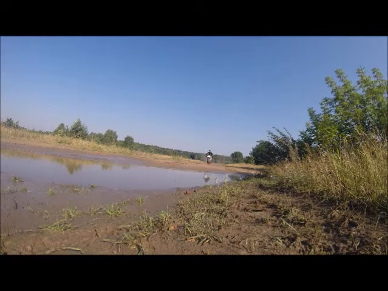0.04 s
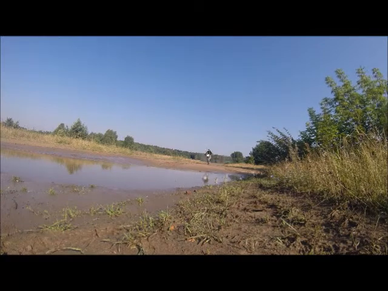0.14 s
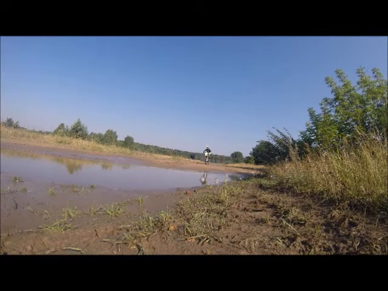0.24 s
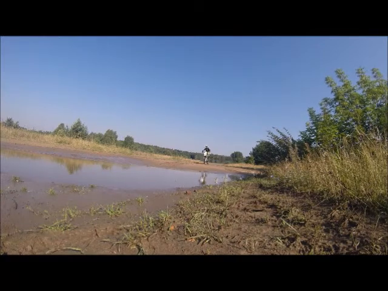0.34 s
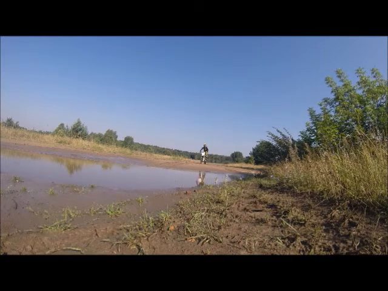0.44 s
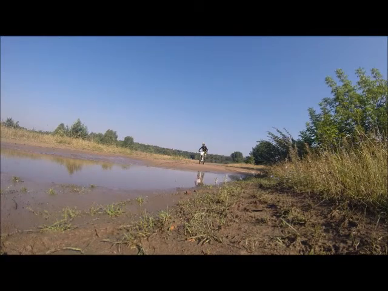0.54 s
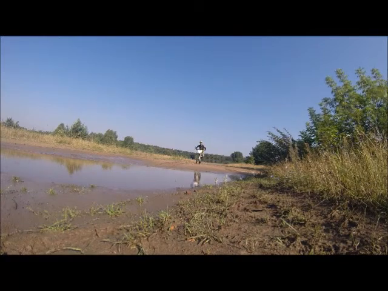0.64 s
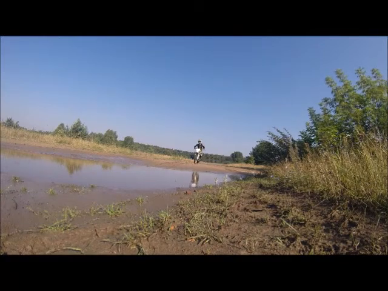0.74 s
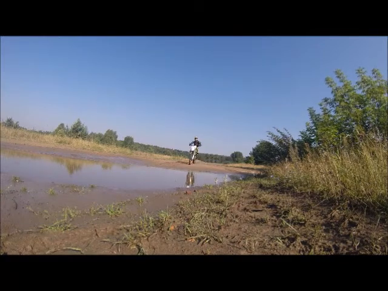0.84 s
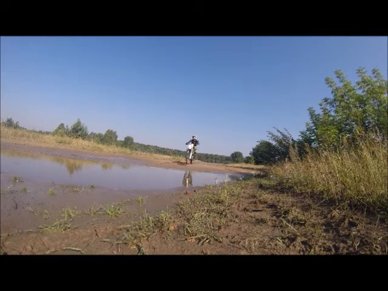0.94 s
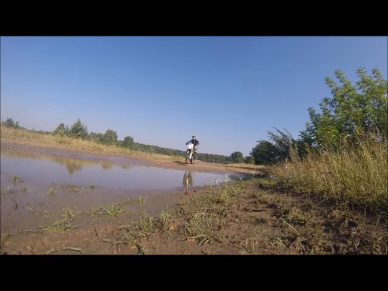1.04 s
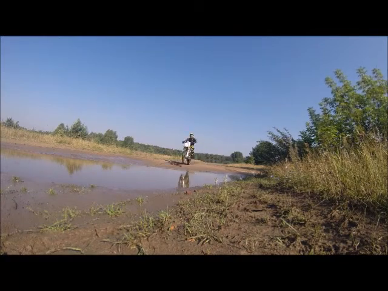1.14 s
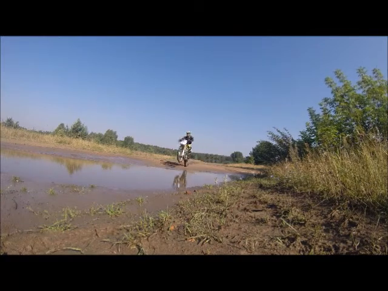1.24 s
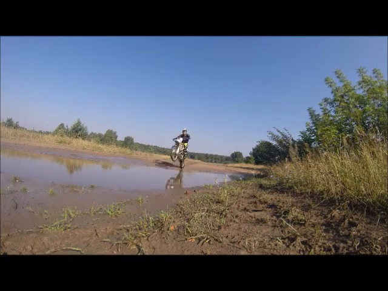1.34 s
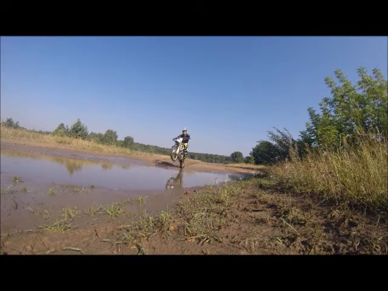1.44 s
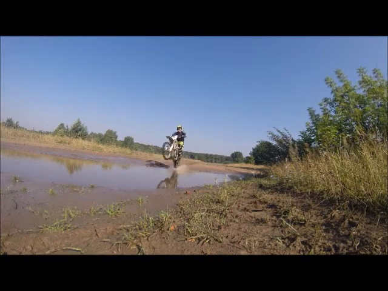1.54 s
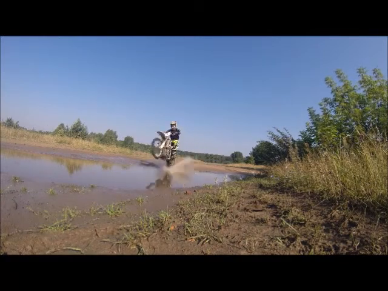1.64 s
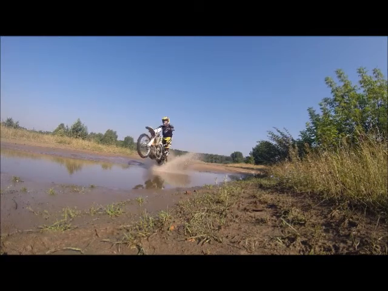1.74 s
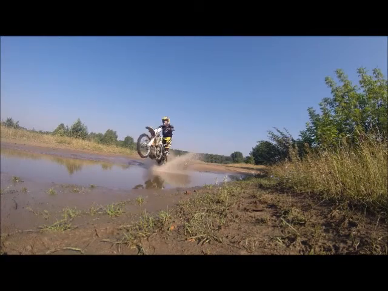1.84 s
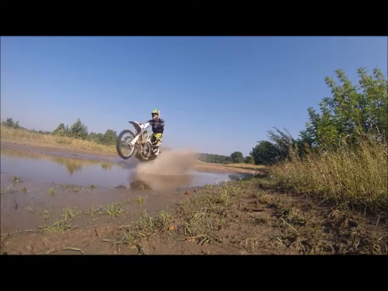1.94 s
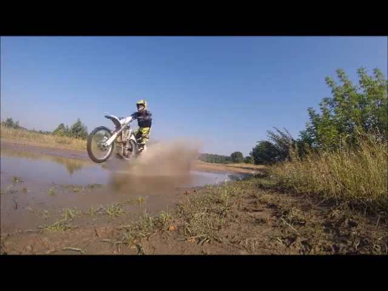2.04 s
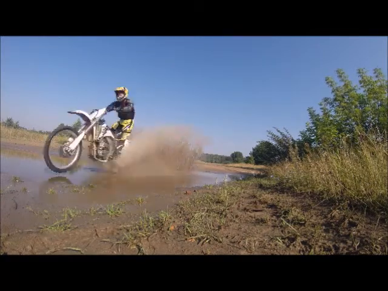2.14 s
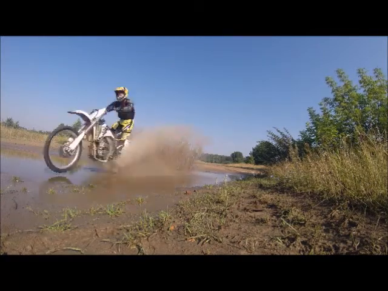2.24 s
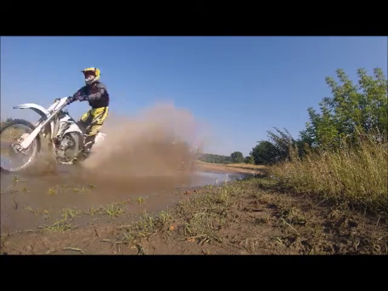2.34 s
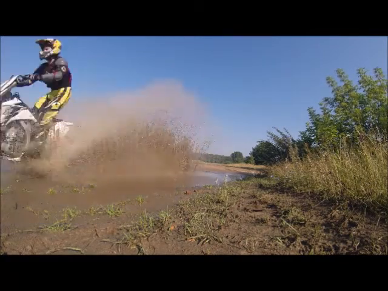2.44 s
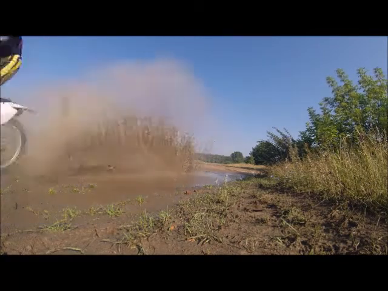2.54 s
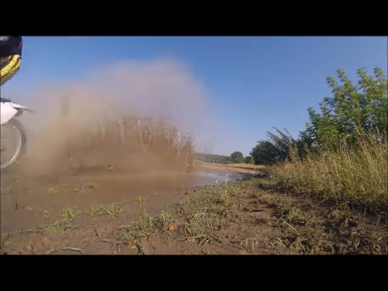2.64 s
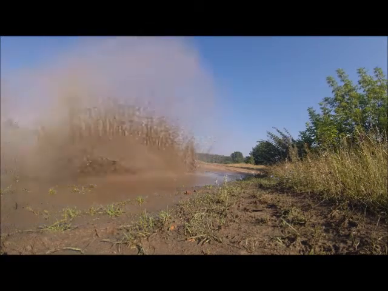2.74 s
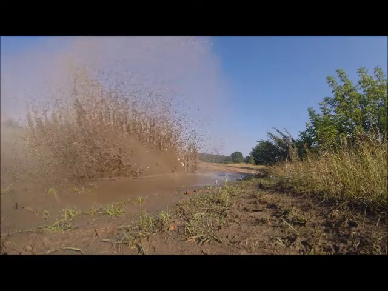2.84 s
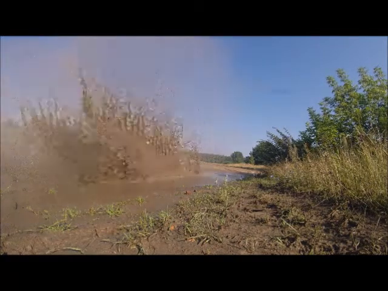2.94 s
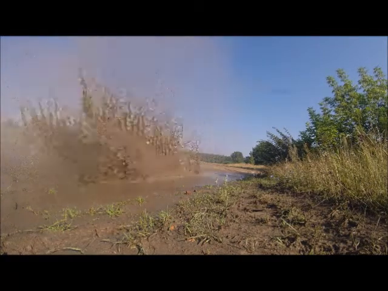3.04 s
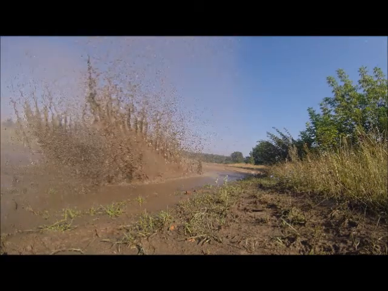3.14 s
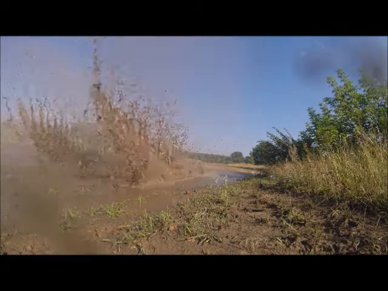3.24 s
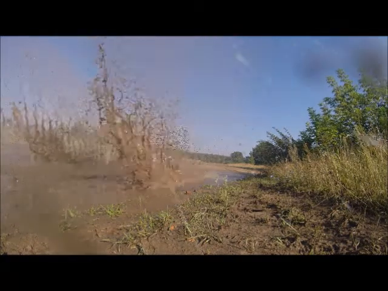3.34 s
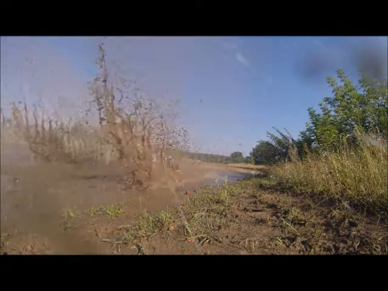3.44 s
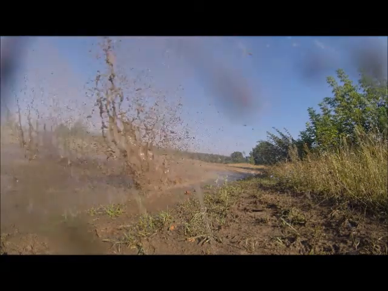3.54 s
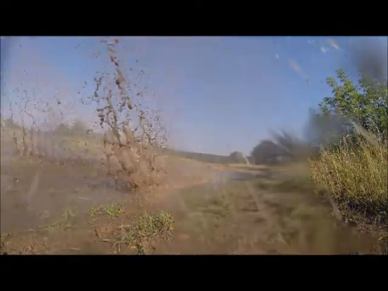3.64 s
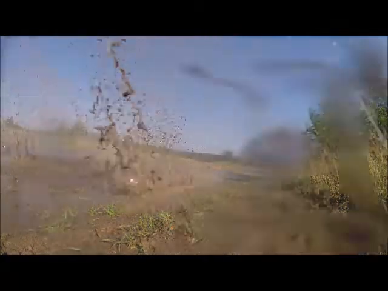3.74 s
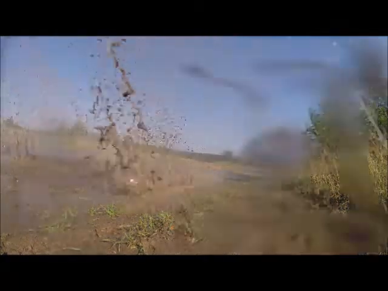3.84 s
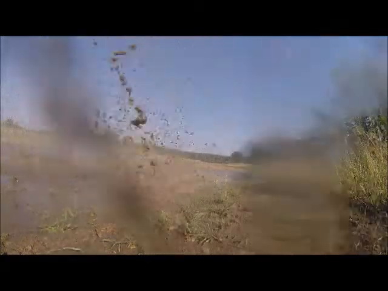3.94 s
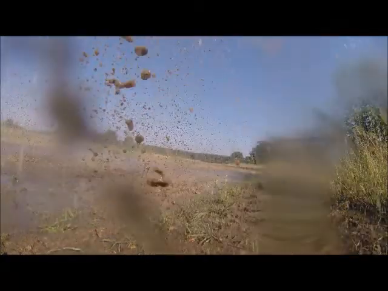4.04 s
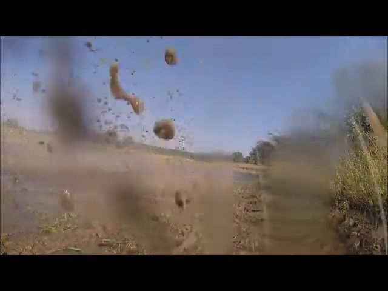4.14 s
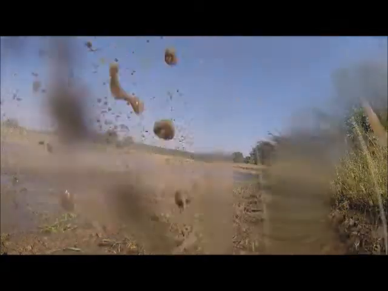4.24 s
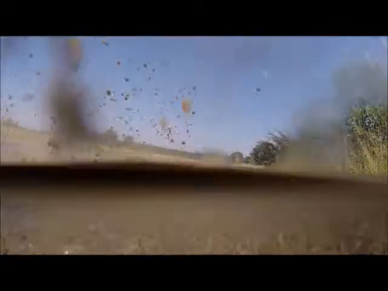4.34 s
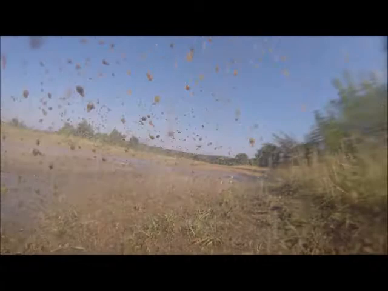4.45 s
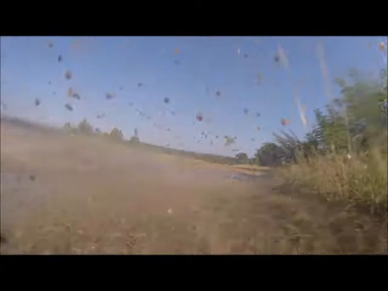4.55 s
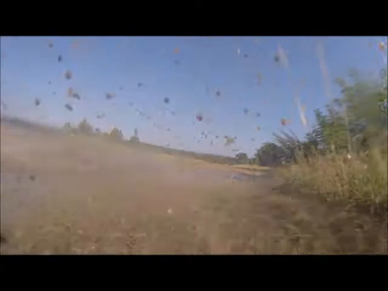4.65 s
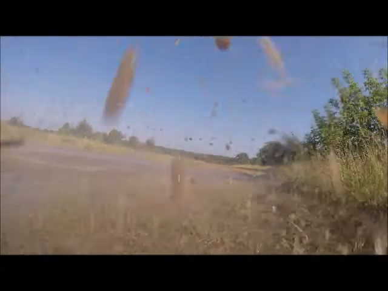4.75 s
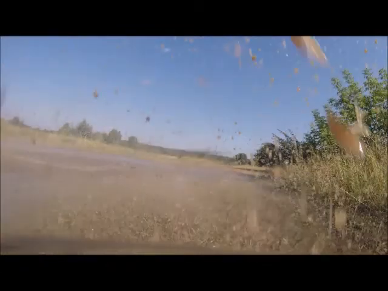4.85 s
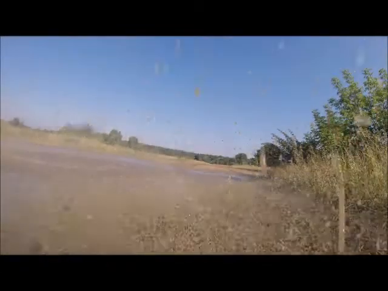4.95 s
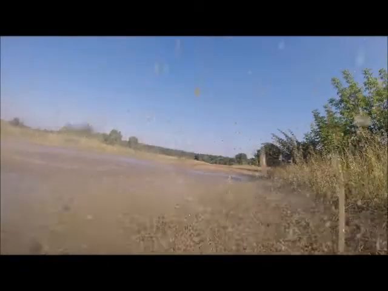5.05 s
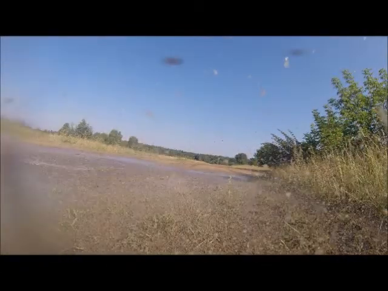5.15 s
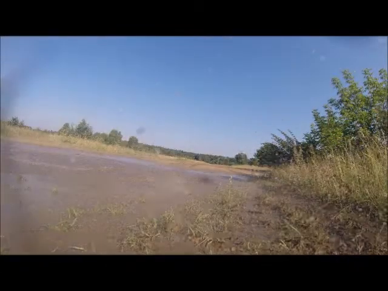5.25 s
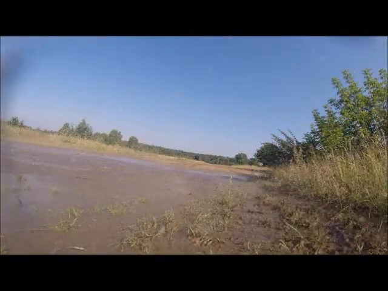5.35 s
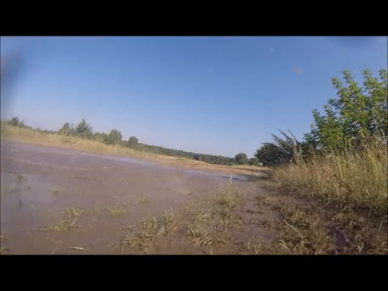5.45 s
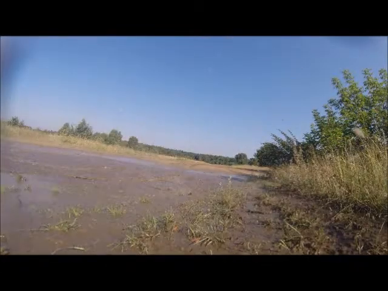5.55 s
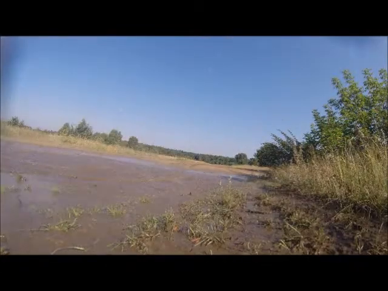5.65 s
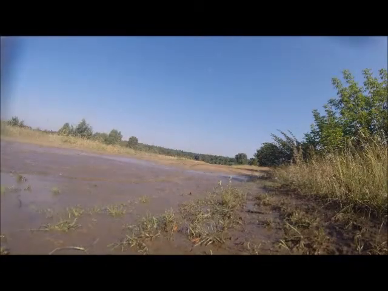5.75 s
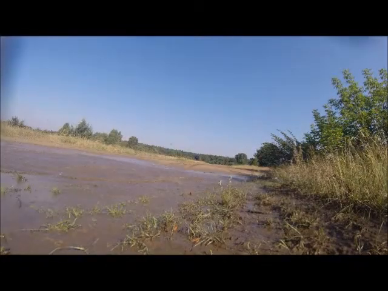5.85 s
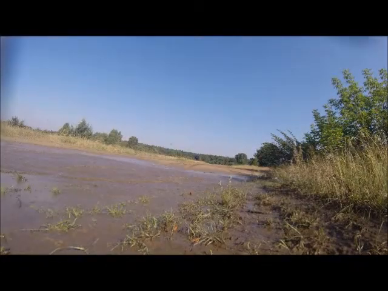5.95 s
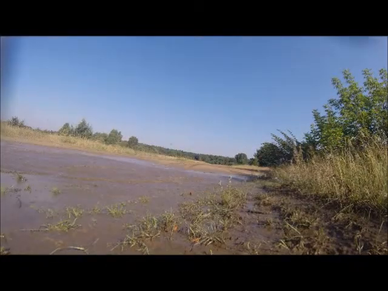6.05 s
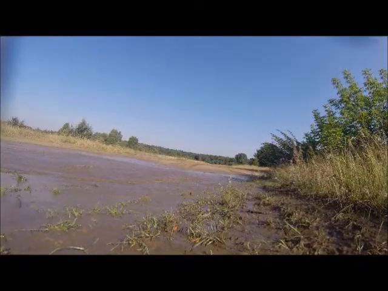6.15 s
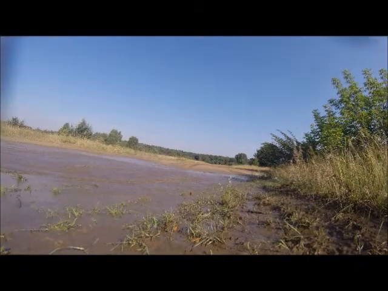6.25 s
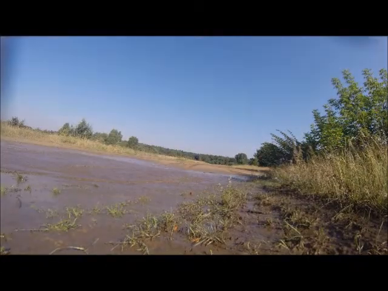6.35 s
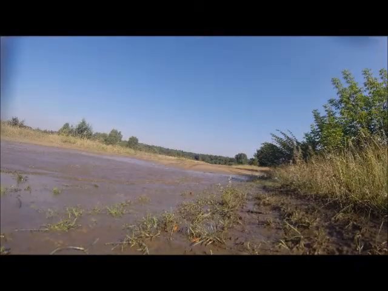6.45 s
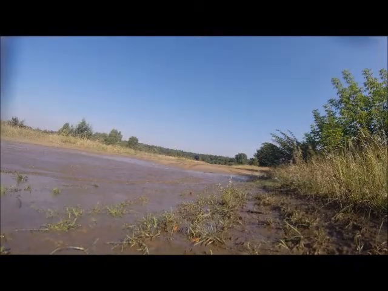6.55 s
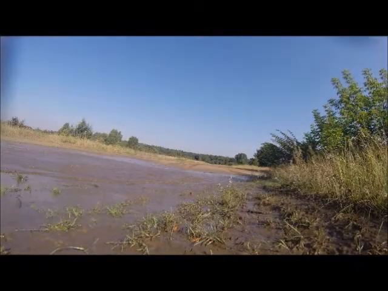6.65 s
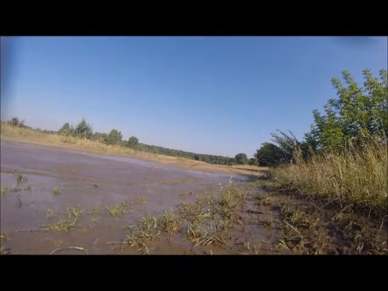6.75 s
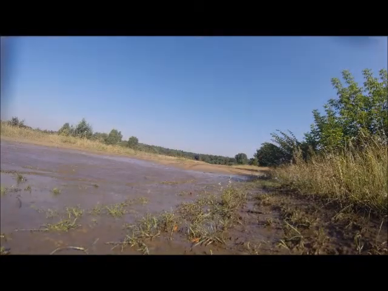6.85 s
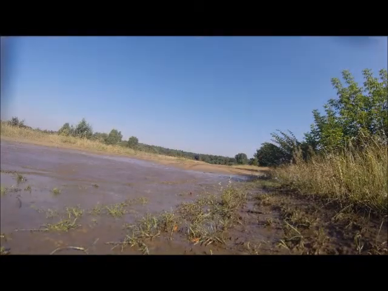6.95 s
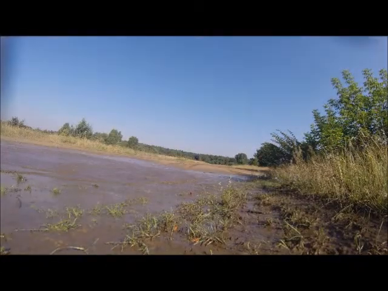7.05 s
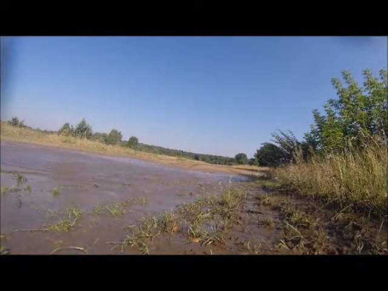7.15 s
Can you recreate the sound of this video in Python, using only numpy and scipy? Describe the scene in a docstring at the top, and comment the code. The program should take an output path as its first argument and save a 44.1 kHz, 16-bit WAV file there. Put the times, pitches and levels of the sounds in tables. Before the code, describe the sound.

Single-cylinder motocross engine nears, cuts out briefly, returns deeper and duller, ploughs through water and fades; hollow mud splats pelt the microphone, then faint wind.

```python
"""A single-cylinder dirt bike nears across a wet field; after a short silent gap it sounds deeper and duller.
The bike ploughs through a puddle past a microphone in a small plastic housing, and thrown mud rains on it.
Then the level drops to light wind, a few last drips, low moans and dull thuds.
Firing pulses excite filters for boom and bark, shaped noise makes roar, wind and hiss,
and struck resonators make the housing ring."""
import sys
import numpy as np
from scipy import signal
from scipy.fft import irfft
from scipy.io import wavfile
from scipy.ndimage import uniform_filter1d

SR = 44100
rng = np.random.default_rng(int(sys.argv[2]) if len(sys.argv) > 2 else 0)


def waveform_to_disk(signal):
    """Save audio, clipped to [-1, 1], as 16-bit WAV at the path in sys.argv[1]."""
    frames = np.transpose(np.atleast_2d(signal))
    scaled = np.clip(frames, -1, 1) * 32767
    samples = np.round(scaled).astype(np.int16)
    wavfile.write(sys.argv[1], SR, samples)


N = 317520


def gain_of(db):
    """The decibel law: twenty decibels to a factor of ten in amplitude."""
    return 10 ** (np.asarray(db) / 20)


def evened(x):
    """Normalisation: scales a signal to rms 1."""
    return x / np.sqrt(np.mean(x ** 2) + 1e-20)


def read(points, hz):
    """Interpolation of a spectrum in dB over log frequency; -90 dB beyond its ends."""
    f, value = np.transpose(points)
    return np.interp(np.log(hz + 1), np.log(f + 1), value, left=-90, right=-90)


def add(mix, s, sound):
    """Superposition: adds a sound to the mix from a time in seconds."""
    part = mix[round(s * SR):][:len(sound)]
    part += sound[:len(part)]


def coloured(x, points):
    """Minimum-phase filtering: the phase follows from the log gain by the Hilbert transform."""
    half = read(points, np.fft.rfftfreq(16384, 1 / SR)) * np.log(10) / 20
    log_gain = uniform_filter1d(np.r_[half, half[-2:0:-1]], size=3, mode="wrap")
    taps = np.fft.ifft(np.exp(np.conj(signal.hilbert(log_gain)))).real[:8192]
    return signal.oaconvolve(x, taps)[:len(x)]


def swept(x, points, ms_per_khz):
    """Dispersion: delay grows with frequency, so each pulse becomes a short upward chirp."""
    hz = np.fft.rfftfreq(4096, 1 / SR)
    phase = -np.pi * ms_per_khz * (hz / 1000) ** 2
    taps = np.fft.fftshift(irfft(gain_of(read(points, hz)) * np.exp(1j * phase)))
    return signal.oaconvolve(x, taps, "same")


def patchy(count, patchy_db):
    """Modulated noise: white noise whose loudness drifts in patches of time and frequency."""
    a, b, patches = rng.standard_normal((count // 128 + 5, 257, 3)).T
    patches = uniform_filter1d(patches, size=2, axis=0)
    patches = evened(uniform_filter1d(patches, size=24, axis=1))
    spectrum = (a + 1j * b) * gain_of(patchy_db * patches)
    return signal.istft(spectrum, nperseg=512, noverlap=384)[1][:count]


def ring(hz, t60, x):
    """Modal resonance: one mode driven by x, decaying by 60 dB in t60 seconds."""
    r = 10 ** (-3 / (t60 * SR))
    turn = 2 * np.pi * hz / SR
    return signal.lfilter([np.sin(turn)], [1, -2 * r * np.cos(turn), r * r], x)


# Wind and shaking at the microphone. Each row: time in seconds, level in dB.
WIND_LEVEL = [(0, -51), (.3, -39), (.6, -48.5), (1.05, -31.5), (1.2, -27), (1.5, -49), (1.901, -39),
              (2.2, -26.5), (2.75, -19), (3.399, -26), (3.901, -23), (4.3, -31), (5.33, -30.5),
              (5.4, -46.5), (6.2, -55), (7.2, -48)]
# Colour of the wind. Each row: frequency in Hz, relative spectrum level in dB per Hz.
WIND_COLOUR = [(8, -14), (22, -6.5), (40, -6), (65, -8), (120, -20), (200, -29.5), (450, -41.5)]
# Colour of the field's hiss. Each row: frequency in Hz, relative spectrum level in dB per Hz.
FIELD_COLOUR = [(88, -42), (150, -2.5), (460, -10), (1080, -15.5), (3670, -25.5), (7710, -42.5),
                (10000, -85)]
FIELD_DB = -66


def air():
    """Turbulence noise: lumpy wind at the microphone over the faint hiss of the field."""
    lumps = evened(uniform_filter1d(rng.standard_normal(N), size=1800))
    wind = evened(coloured(rng.standard_normal(N) * gain_of(1.0 * lumps), WIND_COLOUR))
    hiss = evened(coloured(patchy(N, 1.2), FIELD_COLOUR))
    wind_db = np.interp(np.arange(N) / SR, *np.transpose(WIND_LEVEL))
    return wind * gain_of(wind_db) + gain_of(FIELD_DB) * hiss


THIRD_ORDER, THIRD_DB = 3, -26  # going away, this order of the exhaust drones on
FOURTH_ORDER = 4  # multiples of the firing rate


def engine(speed, end_s, levels, boom, bark, coming, gone, passes_s, turns,
           uneven_db, gate, ms_per_khz, fourth_db, echo, echo_s, rush_db):
    """Pulse excitation: each firing feeds boom and bark; intake, chain and tyre roar throb with the cycle."""
    t = np.arange(speed[0][0], end_s, 1 / SR)
    boom_db, bark_db, roar_db = levels(t)
    cycle = turns + np.cumsum(np.interp(t, *np.transpose(speed))) / SR
    phase = cycle % 1
    passed = np.clip((t - passes_s) / 0.45, 0, 1)  # 0 coming, 1 with its back turned

    # one pulse per firing, uneven in strength
    fired = np.diff(np.floor(cycle), prepend=np.floor(cycle[0]))
    luck = rng.uniform(-1, 1, (300, 2))[cycle.astype(int)]
    low = evened(coloured(fired * gain_of(uneven_db * luck[:, 0]), boom))
    pulses = evened(swept(-fired * gain_of(0.18 * uneven_db * luck[:, 1]), bark, ms_per_khz))
    pulses = evened(pulses + echo * np.roll(pulses, round(echo_s * SR)))  # echo off the ground

    # turbulent gas follows each pulse out
    rush = rng.standard_normal(len(t)) * np.exp(-phase / .3)
    rush = evened(coloured(np.gradient(rush), bark))
    mid = evened(pulses + gain_of(rush_db) * rush)
    mid = mid + gain_of(fourth_db) * np.sin(2 * np.pi * FOURTH_ORDER * cycle)  # the pipe sings

    # the roar changes colour as the bike turns its back
    noise = patchy(len(t), 1.9) * (1 + gate * np.exp(-phase / 0.66))
    roar_coming = np.sqrt(1 - passed) * evened(coloured(noise, coming))
    roar = roar_coming + np.sqrt(passed) * evened(coloured(noise, gone))

    # going away, the pulses lose their edge
    muffled = signal.lfilter(*signal.butter(3, [60, 245], "band", fs=SR), low + pulses)
    low = (1 - passed) * low + passed * evened(muffled)
    low = np.roll(low, -round(0.00891 * SR))  # the slow swell starts before the bark
    drone = passed * np.clip((end_s - t) / 0.68, 0, 1) * np.sin(2 * np.pi * THIRD_ORDER * cycle)
    exhaust = gain_of(THIRD_DB) * drone + gain_of(boom_db) * low + gain_of(bark_db) * mid
    return t[0], exhaust + gain_of(roar_db) * roar


# Distant throttle blips. Each row: start in seconds, length in seconds, pipe bark in dB, hum in dB.
BLIPS = [(0.112, 0.21, -44.5, -38.5), (0.459, 0.24, -47.5, -39), (0.649, 0.2, -39, -61)]
OPEN_S, CLOSE_S = 0.04, 0.097  # the throttle opens and shuts
COAST_BARK_DB, COAST_BOOM_DB, COAST_ROAR_DB = -58, -45.5, -53  # throttle shut, at time 0
BOOM_RISE_DB_PER_S, ROAR_RISE_DB_PER_S = 9.5, 10.5  # coming closer
BLIP_BOOM_DB = -13  # an open throttle thins the boom
BLIP_ROAR_SHARE = 0.31  # the roar takes this share of the bark's lift


def far_levels(t):
    """Level law: boom, bark and roar in dB for a slow approach with throttle blips on top."""
    start, length, bark_db, _ = np.transpose(BLIPS)[:, :, None]
    opened = np.minimum((t - start) / OPEN_S, (start + length - t) / CLOSE_S)
    opened = np.clip(opened, 0, 1)
    bark_lift_db = (opened * (bark_db - COAST_BARK_DB)).max(axis=0)
    boom_db = COAST_BOOM_DB + BOOM_RISE_DB_PER_S * t + BLIP_BOOM_DB * opened.max(axis=0)
    roar_db = COAST_ROAR_DB + ROAR_RISE_DB_PER_S * t + BLIP_ROAR_SHARE * bark_lift_db
    return boom_db, COAST_BARK_DB + bark_lift_db, roar_db


# Engine speed before the gap. Each row: time in seconds, firings per second.
FAR_SPEED = [(0, 51.2), (0.08, 51.5), (0.16, 59.17), (0.23, 58.33), (0.3, 48.57), (0.42, 45.8),
             (0.5, 52.25), (0.6, 55.53), (0.76, 54.97), (0.82, 47.6), (0.94, 43.4)]
# Colours of far boom, bark and roar. Each row: frequency in Hz, relative spectrum level in dB per Hz.
FAR_BOOM = [(40, -44), (100, -2), (140, 6), (185, -1.5), (300, -10), (500, -30)]
FAR_BARK = [(120, -33), (220, 9.5), (450, 5), (750, 7.5), (1100, -10), (2200, -26), (3500, -50)]
FAR_ROAR = [(150, -4), (250, -5), (850, -14), (1700, -15.5), (2270, -26), (2600, -19), (4000, -25.5),
            (7700, -40), (11000, -43.5), (12500, -57), (16000, -45)]


def far_bike():
    """Pulse excitation at a distance: the bike before the gap, facing the listener throughout."""
    return engine(FAR_SPEED, .935, far_levels, FAR_BOOM, FAR_BARK, FAR_ROAR, FAR_ROAR,
                  passes_s=9,  # beyond its end, so it never turns its back
                  turns=.735,  # part of a cycle done at the start
                  uneven_db=2.2, gate=1.0, ms_per_khz=1.0, fourth_db=-28.0,
                  echo=0.24, echo_s=0.00097, rush_db=-26)


def wavering_turns():
    """Frequency modulation: the phase of a slightly wavering 1 Hz tone, in radians."""
    waver = evened(uniform_filter1d(rng.standard_normal(N), size=3000))
    return 2 * np.pi * np.cumsum(1 + 0.01 * waver) / SR


HUM_HZ, HUM_LAG_S, HUM_SWELL_S = 80, 0.057, 0.13


def hum():
    """Amplitude envelope: a wavering low tone swells just after each distant blip starts."""
    t = np.arange(N) / SR
    start, _, _, hum_db = np.transpose(BLIPS)[:, :, None]
    swell = np.exp(-((t - start - HUM_LAG_S) / HUM_SWELL_S) ** 2)
    level = (gain_of(hum_db) * swell).sum(axis=0)
    return np.sqrt(2) * level * np.sin(HUM_HZ * wavering_turns())


# Roar of the bike coming, in the water and leaving. Each row: time in seconds, level in dB.
PASS = [(.96, -50), (1.12, -40), (1.4, -36), (1.84, -34.5), (1.92, -29.5), (2.3, -24.5), (2.9, -21.5),
        (3.05, -28.5), (3.4, -35), (3.7, -39.5), (4.15, -45.5)]
PULL_START_S, PULL_END_S = 1.056, 2.9  # one long pull on the throttle
PULL_BARK_DB, PULL_RISE_DB_PER_S = -30, 131
NEARING_DB_PER_S = 0.6  # the bark grows a little as the bike closes in
LIFT_S, LIFT_BARK_DB = 0.13, -50.5  # then the rider lifts off
BOOM_COMING_DB, BOOM_GONE_DB = -1.5, 2  # boom over the roar, before and after the lift
BOOM_LINGERS_S, BOOM_FADE_DB_PER_S = 0.24, 28


def near_levels(t):
    """Level law: boom follows the roar, and bark follows the throttle."""
    roar_db = np.interp(t, *np.transpose(PASS))
    lifted = np.clip((t - PULL_END_S) / LIFT_S, 0, 1)
    pull_db = PULL_BARK_DB + NEARING_DB_PER_S * (t - PULL_START_S)
    pull_db = pull_db - PULL_RISE_DB_PER_S * np.maximum(PULL_START_S - t, 0)
    boom_db = roar_db + BOOM_COMING_DB + (BOOM_GONE_DB - BOOM_COMING_DB) * lifted
    fade_s = np.clip(t - PULL_END_S - BOOM_LINGERS_S, 0, BOOM_LINGERS_S)
    boom_db = boom_db - BOOM_FADE_DB_PER_S * fade_s
    return boom_db, pull_db + (LIFT_BARK_DB - pull_db) * lifted, roar_db


# Engine speed after the gap. Each row: time in seconds, firings per second.
NEAR_SPEED = [(0.96, 24.32), (1.06, 28.47), (1.15, 31.29), (1.22, 35.31), (1.32, 37.62), (1.45, 38.49),
              (1.6, 37.32), (1.72, 35.28), (1.8, 32.61), (1.88, 34.83), (1.96, 33.12), (2.05, 32.07),
              (2.2, 32.6), (2.33, 34.49), (2.44, 32.81), (2.7, 34.23), (2.9, 32.74), (3.02, 26.3),
              (3.13, 24.8), (3.28, 22.6), (3.7, 22.5)]
# Colours of near boom, bark and roar, the roar coming and gone.
# Each row: frequency in Hz, relative spectrum level in dB per Hz.
NEAR_BOOM = [(14, -23.5), (34, 11.5), (50, -6), (70, 1), (100, -6), (135, -2.5), (200, -16), (270, -15),
             (400, -58.5)]
NEAR_BARK = [(50, -35.5), (95, 1.5), (170, 5.5), (220, 3), (330, -2.5), (470, -1.5), (560, -10.5),
             (760, -10), (1500, -45)]
ROAR_COMING = [(250, -40.5), (420, 0), (542, -8.5), (750, -5.5), (880, -3), (960, -14), (1065, -1.5),
               (1160, -19), (1290, -2), (1400, -6.5), (2230, -5.5), (3170, -17.5), (3620, -15), (4350, -31),
               (6500, -34), (7710, -46.5), (10000, -102)]
ROAR_GONE = [(200, -15), (392, -12.5), (744, -11.5), (1110, -11), (1230, -3.5), (1500, 2.5), (1720, -10.5),
             (2200, -9), (2600, -16.5), (7710, -44.5), (10000, -84)]


def near_bike():
    """Pulse excitation with directivity: the bike after the gap, duller once its back is turned."""
    return engine(NEAR_SPEED, PASS[-1][0], near_levels, NEAR_BOOM, NEAR_BARK, ROAR_COMING, ROAR_GONE,
                  passes_s=2.56,
                  turns=.26,  # part of a cycle done at the start
                  uneven_db=0.5, gate=0.47, ms_per_khz=3.0, fourth_db=-3.5,
                  echo=0.29, echo_s=0.002364, rush_db=-6.0)


# Modes of the plastic housing. Each row: frequency in Hz, relative level in dB,
# decay time t60 in seconds when struck by a clod or drip.
HOUSING = [(760, 3, 0.043), (880, 0, 0.023), (1060, 2.5, 0.028), (1270, 3, 0.028), (1472, 1.5, 0.026),
           (1801, 1, 0.028), (2210, -1, 0.01), (2804, -8.5, 0.002), (3100, -12, 0.05)]
# Fine spray on the housing. Each row: time in seconds, level in dB.
SPRAY = [(3, -41), (3.75, -33.5), (3.85, -28.5), (4.78, -33), (5.32, -34), (5.379, -50), (5.701, -56.5),
         (6.3, -67.5), (7.2, -67.5)]


def spray():
    """Random impacts: a clumped patter of drops rings the modes; returns the ringing and the contact noise."""
    clumps = gain_of(9.4 * evened(uniform_filter1d(rng.standard_normal(N), size=500)))
    drops = gain_of(5.0 * np.minimum(rng.exponential(1, N), 4)) * rng.choice([-1, 1], N)
    drops *= rng.random(N) < 600 * clumps / SR
    drops += gain_of(-12.5) * np.sqrt(clumps) * rng.standard_normal(N)  # mist between the drops
    spot = rng.integers(0, len(HOUSING), N)  # each drop strikes one mode
    patter = np.zeros(N)
    for k, (hz, db, t60) in enumerate(HOUSING):
        patter += gain_of(db) * ring(hz, 0.5 * t60, drops * (spot == k))
    s, db = np.transpose(SPRAY)
    level = gain_of(np.interp(np.arange(N) / SR, s, db, left=-120))
    return level * evened(patter), gain_of(-4.0) * level * evened(drops)


NEAREST_DB_PER_OCTAVE = 15  # modes far from the plop's pitch ring less
HOLDING_HZ = 900  # plops below this pitch hold and stop, those above die away


def splat(db, pitch_hz, crack_db, length_ms):
    """Impact on a resonant shell: a pitched plop; the rougher the crack, the more the nearest modes ring."""
    ms = np.arange(2600) * 1000 / SR
    held = np.exp(-(ms / length_ms) ** (4 if pitch_hz < HOLDING_HZ else 1.5))
    push = rng.standard_normal(len(ms)) * (held + gain_of(-19.5 - 1.0 * ms))
    push[0] += 5.0  # first contact
    glide = 1.04 - 0.0093 * ms
    plop = np.minimum(ms / 0.17, 1) * held * np.sin(2 * np.pi * pitch_hz * ms / 1000 * glide)
    body = np.zeros(len(ms))
    for hz, mode_db, t60 in HOUSING:
        octaves = abs(np.log2(hz / pitch_hz))
        body += gain_of(mode_db - NEAREST_DB_PER_OCTAVE * octaves) * ring(hz, t60, push)
    body = gain_of(4.0 + 0.33 * crack_db) * body / abs(body).max()
    return gain_of(db) * (plop + body), gain_of(db + crack_db) * push


# Clods of mud on the housing. Each row: start in seconds, plop level in dB, nominal pitch in Hz,
# crack drive re plop in dB (before its colouring), decay length in ms.
CLODS = [(3.492, -30.5, 1495, 12, 10.5), (3.636, -27.5, 740, -3, 4.6), (3.827, -16.5, 723, -11, 14),
         (3.848, -20.5, 740, -13.5, 8.8), (3.872, -23, 780, -16, 4.5), (3.963, -14.5, 1170, 0, 2.7),
         (3.974, -15, 810, -5, 4.9), (4.009, -10.5, 805, -24, 4), (4.021, -13, 760, -28.5, 7.3),
         (4.064, -10.5, 790, -15.5, 4.2), (4.077, -12, 794, -21.5, 3.7), (4.099, -0.5, 787, -40, 5.5),
         (4.119, -8.5, 785, -33, 2.8), (4.136, -21.5, 3050, 7, 4.3), (4.176, -5, 815, -55, 4.3),
         (4.235, -20.5, 790, -8, 7), (4.321, -15.5, 795, -19, 3.9), (4.356, -19.5, 740, 4.5, 7.6),
         (4.374, -19, 2960, -13, 4), (4.388, -23, 1270, -11, 3), (4.411, -17.5, 1060, -18, 7.4),
         (4.422, -17, 795, -15, 4.9), (4.432, -13, 790, -16, 5.9), (4.439, -23, 2700, -7.5, 5.5),
         (4.451, -11.5, 800, -20, 5.4), (4.467, -10.5, 820, -21, 2.4), (4.5, -15, 1140, -9, 6.8),
         (4.512, -15.5, 1150, -14, 4.5), (4.559, -19, 624, -3.5, 5.1), (4.609, -14, 1130, -14, 5.4),
         (4.626, -10.5, 1070, -11, 5.7), (4.642, -12.5, 1050, -4, 7), (4.66, -13, 1200, -13, 4.7),
         (4.681, -13.5, 1180, -18, 5), (4.701, -14.5, 1340, -2.5, 3.9), (4.716, -14, 720, -12, 4),
         (4.756, -39, 1190, 17.5, 4.9), (4.817, -19.5, 1100, -7, 2.7), (4.842, -15, 1135, -20.5, 4.7),
         (4.911, -19, 786, -29.5, 4.2), (4.93, -18, 800, -21, 5), (4.964, -2, 2130, -14, 1.9),
         (5.025, -20.5, 690, -8, 4.4), (5.058, -21.5, 1240, -8, 5.4), (5.071, -22.5, 714, -9, 6),
         (5.097, -12, 860, -19, 5.8), (5.114, -12.5, 757, -9, 6.5), (5.15, -5.5, 1170, -5, 4.4),
         (5.184, -5, 1100, -8.5, 4.4), (5.202, -5, 1170, -26, 7.8), (5.248, -10.5, 1170, -2, 4.4),
         (5.294, -23, 770, 4, 3.3), (5.302, -16, 1120, -24, 7), (5.325, -2, 1947, -10.5, 7.1)]
# Late drips on the housing. Each row: start in seconds, plop level in dB, nominal pitch in Hz,
# crack drive re plop in dB (before its colouring).
DRIPS = [(5.384, -31, 1020, -16), (5.418, -44, 1070, -11), (5.458, -45.5, 1240, 11),
         (5.577, -39.5, 1243, 2), (5.585, -28.5, 1080, -30), (5.653, -41, 1600, -33),
         (5.717, -44, 872, -27), (5.767, -31.5, 974, -10), (5.794, -44.5, 1950, 9),
         (5.82, -47.5, 1120, 9.5), (5.843, -45, 754, -11), (5.889, -40, 740, -4), (5.924, -34.5, 2070, -13),
         (5.978, -43, 1000, -9), (6.014, -50, 1150, 4.5), (6.084, -44.5, 1530, -12),
         (6.098, -38.5, 722, -6), (6.116, -42, 1370, -5), (6.221, -48.5, 1220, -17),
         (6.303, -37.5, 1080, -17), (6.913, -41, 1127, -12)]
DRIP_MS = 4
# Colour of the contact crack. Each row: frequency in Hz, relative spectrum level in dB per Hz.
CRACK_COLOUR = [(220, -25), (880, -21), (1500, -8), (3100, -7), (3480, -15), (6450, -20), (7710, -31),
                (10500, -72)]


def mud():
    """Shell radiation: clods, drips and spray ring a housing too small for bass, with a crack at contact."""
    body, push = spray()
    for s, *row in CLODS + [(*drip, DRIP_MS) for drip in DRIPS]:
        rung, pushed = splat(*row)
        add(body, s, rung)
        add(push, s, pushed)
    crack = gain_of(9.5) * coloured(push, CRACK_COLOUR)
    stiff = signal.butter(2, 400, "high", fs=SR)
    return signal.lfilter(*stiff, body) + crack


# Heavy lumps that shove the whole housing. Each row: start in seconds, level in dB, cycle length in ms.
SHOVES = [(4.698, -4, 22)]


def shoves():
    """Inertial displacement: a shove bends the microphone membrane out and back for 1.3 cycles."""
    out = np.zeros(N)
    for s, db, ms in SHOVES:
        u = np.arange(0, 1.3, 1000 / ms / SR)
        bend = np.sin(2 * np.pi * u) * np.sin(np.pi * u / 1.3) ** 0.37
        add(out, s, -gain_of(db) * bend)
    return out


# Dull thuds: three close together, then the spaced firings of a distant engine. Each row: start in seconds,
# level in dB, pitch in Hz.
THUDS = [(4.958, -22.5, 113), (5.021, -16, 112.8), (5.157, -15.5, 118), (6.4, -46, 164),
         (6.611, -45.5, 165), (6.829, -46, 159.2), (6.94, -46, 165), (7.045, -43, 170.7),
         (7.147, -47.5, 164.6)]


def thuds():
    """Heavily damped oscillation: each thud is a few low cycles under a quick swell and decay."""
    out = np.zeros(N)
    t = np.arange(4000) / SR
    for s, db, hz in THUDS:
        swell = t * hz / 0.6 * np.exp(1 - t * hz / 0.55)
        add(out, s, gain_of(db) * np.sin(2 * np.pi * hz * t) * swell)
    return out


def drip_nudges():
    """Transient displacement: each drip also nudges the membrane out and back."""
    out = np.zeros(N)
    u = np.arange(4000) / SR / .0005
    for s, db, *_ in DRIPS:
        add(out, s, gain_of(db - 7) * u * (2 - u) * np.exp(-u))
    return out


# Low moans in the late quiet. Each row: middle in seconds, half length in seconds, level in dB.
MOANS = [(5.455, 0.083, -42), (5.757, 0.091, -45.5), (6.476, 0.213, -45.5), (7.069, 0.055, -47)]
MOAN_HZ = 42.5


def moans():
    """Amplitude envelope: a wavering deep tone swells and fades in the late quiet."""
    t = np.arange(N) / SR
    level = sum(gain_of(db) * np.exp(-((t - s) / half) ** 4) for s, half, db in MOANS)
    return np.sqrt(2) * level * np.sin(MOAN_HZ * wavering_turns())


def scene():
    """Superposition of air, bike, mud and low tones."""
    mix = air() + hum() + mud() + shoves() + thuds() + drip_nudges() + moans()
    add(mix, *far_bike())
    add(mix, *near_bike())
    return mix[None]


GAP_START_S, GAP_END_S = .932, .963  # silent span
EDGE_HZ, DULL_EDGE_HZ = 15000, 7865  # upper band limit, overall and after the gap


def low_passed(x, edge_hz):
    """Band limitation: a linear-phase low-pass filter."""
    taps = signal.firwin(511, edge_hz, window=("kaiser", 9), fs=SR)
    return signal.oaconvolve(x, taps[None], "same")


def record(dry):
    """Overload clipping and band limitation, with a silent gap after which the band is narrower."""
    t = np.arange(N) / SR
    loud = np.clip(dry, -.92, .92)
    dull = low_passed(loud, DULL_EDGE_HZ)
    before = np.clip((GAP_START_S - t) / 0.00046, 0, 1)
    after = np.clip((t - GAP_END_S) / 0.0018, 0, 1)
    return low_passed(before * loud + after * dull, EDGE_HZ)


dry = scene()
out = record(dry)
waveform_to_disk(out)
```